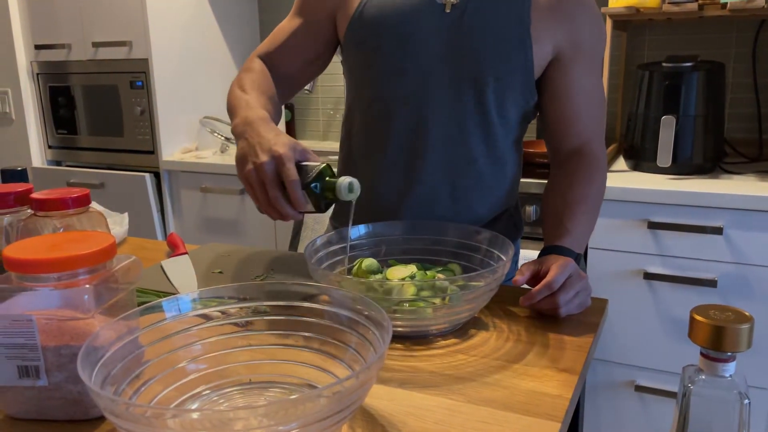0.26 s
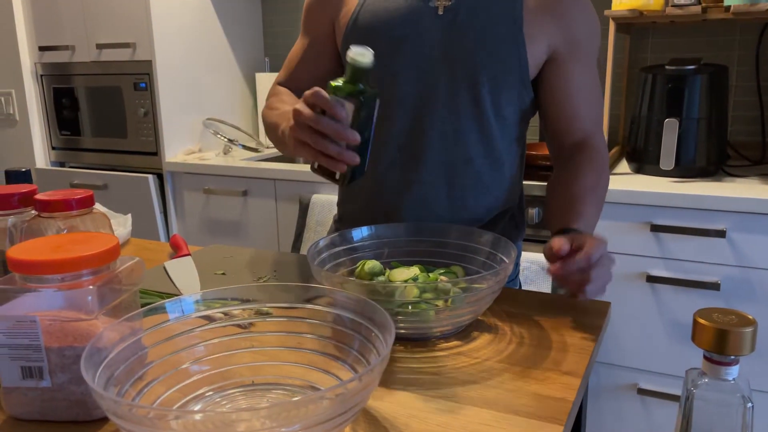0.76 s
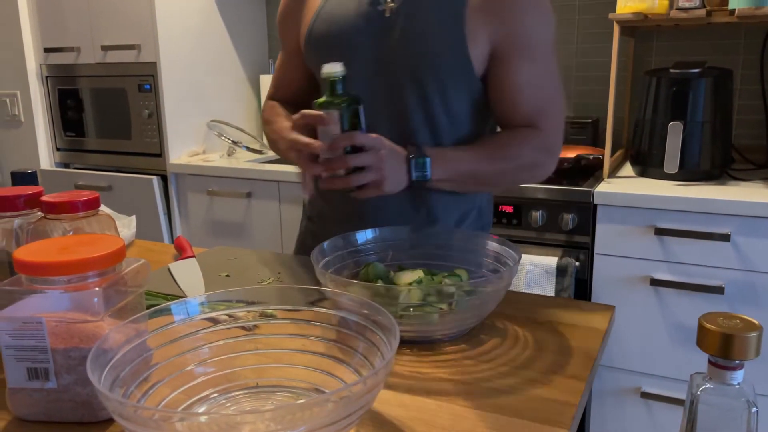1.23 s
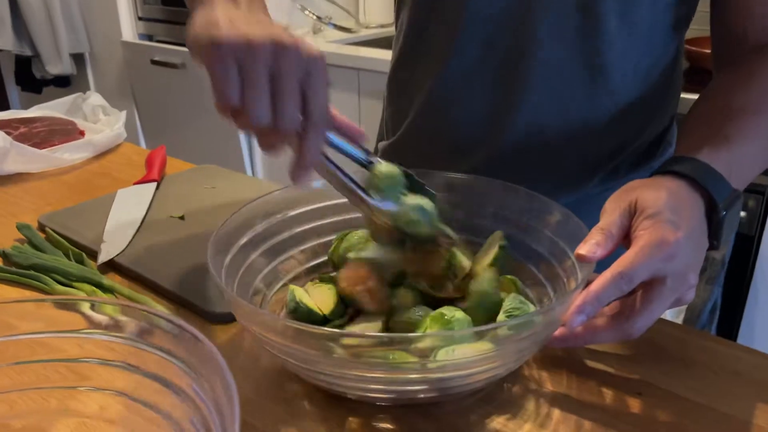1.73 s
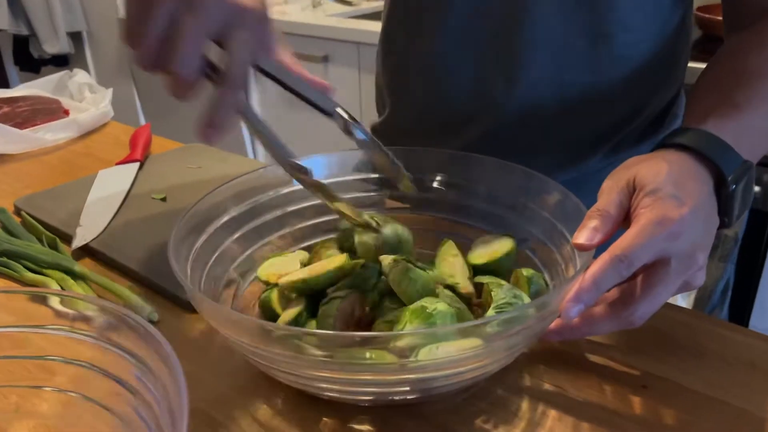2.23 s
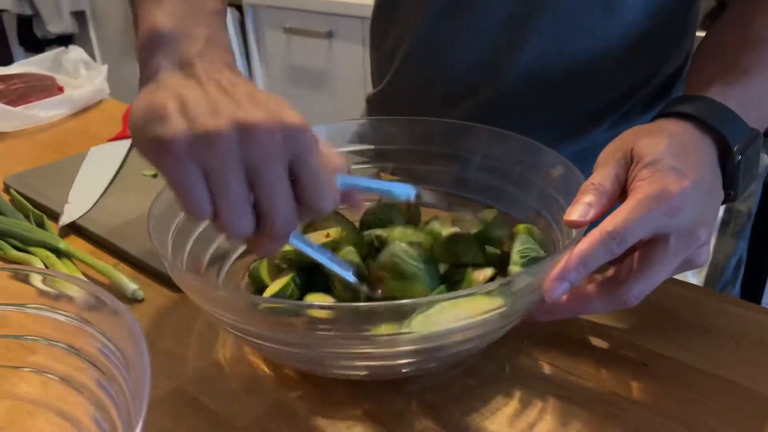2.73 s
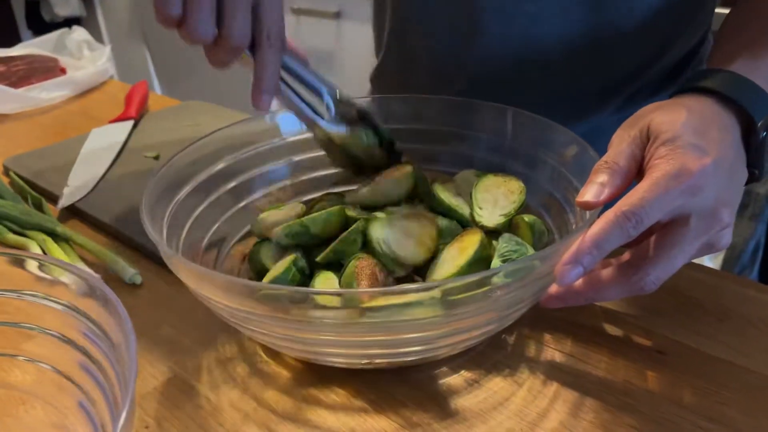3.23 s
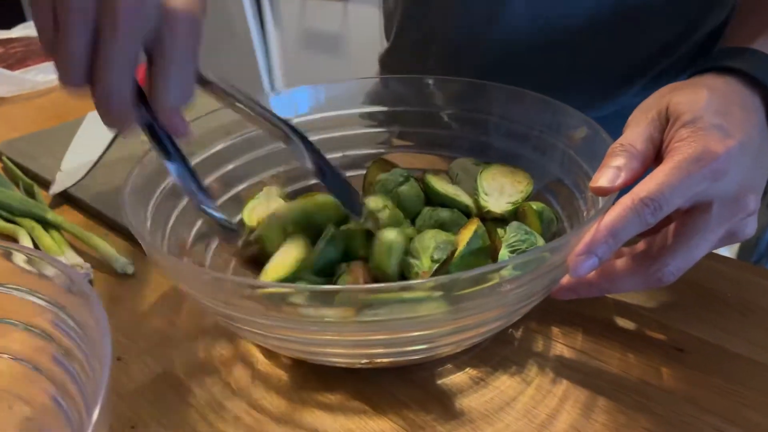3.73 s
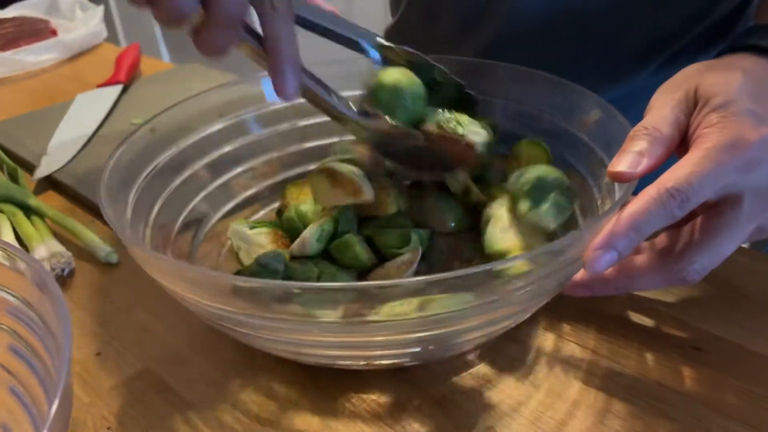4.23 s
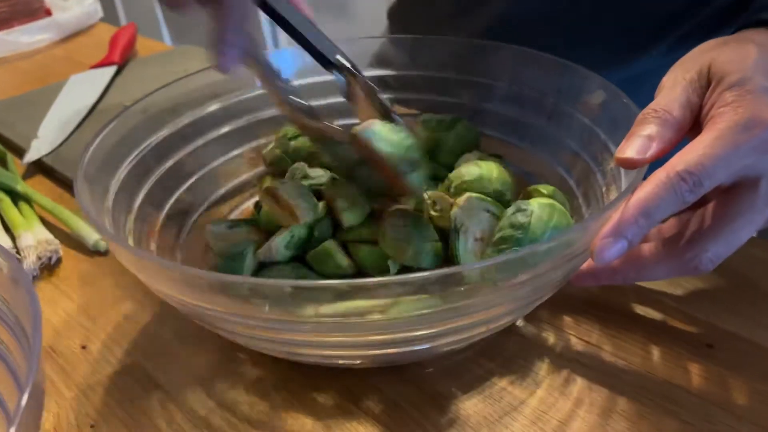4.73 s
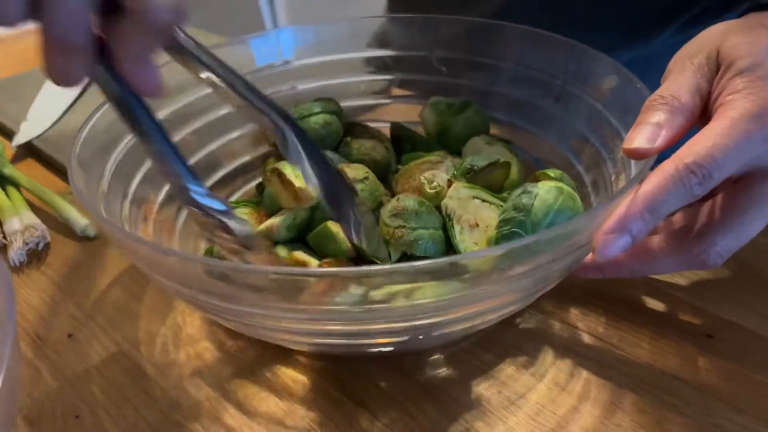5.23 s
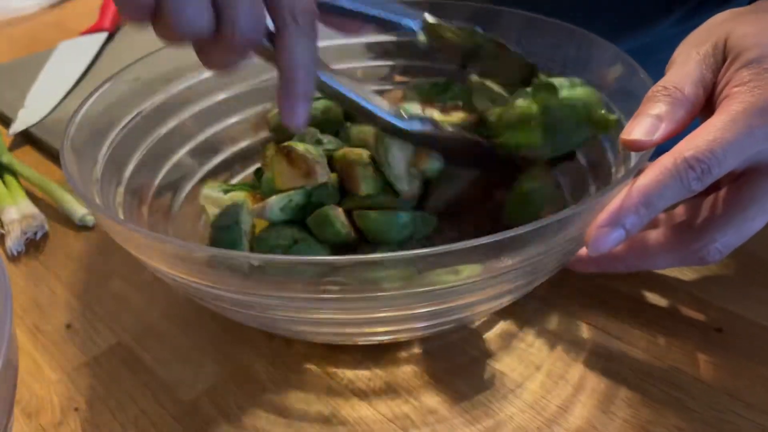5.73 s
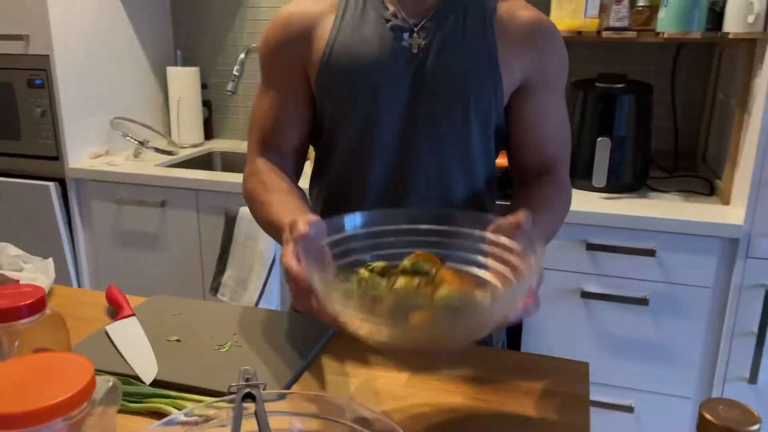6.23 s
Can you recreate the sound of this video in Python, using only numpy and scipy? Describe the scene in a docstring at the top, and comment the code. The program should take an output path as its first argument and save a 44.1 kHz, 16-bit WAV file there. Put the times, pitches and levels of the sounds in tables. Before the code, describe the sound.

Quiet kitchen air and low handling rumble surround soft bubbling gulps from a bottle, followed by a barely audible brush of clothes. Closer up, metal tongs stir oily sprouts in uneven strokes, with crackling leaves, dull tumbling pieces and sharp knocks on the glass, a few leaving a short ring. Fine steel ticks scatter between them. At the end the stirring cuts off into soft handling.

```python
"""Tossing sprouts in a glass bowl

A small kitchen at a wooden counter, on a hand-held microphone that sways with a deep rumble.
A last drizzle of oil glugs from a bottle as damped, rising bubbles; then steel tongs toss halved sprouts.
The tongs clack on the bowl and tick as ringing modes, sprouts thud back on the low modes,
and oily leaves rustle and crackle as showers of tiny clicks. The room answers the bowl, leaves and hands."""
import sys
import numpy as np
from scipy import signal
from scipy.fft import rfft, irfft
from scipy.io import wavfile
from scipy.ndimage import uniform_filter1d

SR = 44100
rng = np.random.default_rng(int(sys.argv[2]) if len(sys.argv) > 2 else 0)


def master_out(mix):
    """Clip the mix to full scale and print it as 16-bit PCM to the path in sys.argv[1]."""
    frames = np.transpose(np.atleast_2d(mix))
    ceiling = np.clip(frames, -1, 1)
    pcm = np.round(ceiling * 32767).astype(np.int16)
    wavfile.write(sys.argv[1], SR, pcm)


N = 285055
T = np.arange(N) / SR  # s
RING_T = T[:SR // 4]  # a quarter of a second for each single blow


def undb(db):
    """Decibels to gain."""
    return 10 ** (np.asarray(db) / 20)


def unit(x):
    """Scale to rms 1."""
    return x / np.sqrt(np.mean(x ** 2))


def curve(rows):
    """Gain over time from a table of (s, dB)."""
    return undb(np.interp(T, *np.transpose(rows)))


def add(track, s, x):
    """Mix x into the track from time s."""
    i = max(int(s * SR), 0)
    track[i:i + len(x)] += x[:N - i]


def colour(x, points):
    """Filter by a spectrum of (Hz, dB) points, joined on a log-frequency axis."""
    hz, db = np.transpose(points)
    f = np.maximum(np.fft.rfftfreq(len(x), 1 / SR), 1)
    gain = undb(np.interp(np.log(f), np.log(hz), db))
    return irfft(rfft(x) * gain, len(x))


def bell(f, hz, octaves):
    """Smooth weight around a centre on a log-frequency axis."""
    return np.exp(-.5 * (np.log2(np.maximum(f, 1) / hz) / octaves) ** 2)


def band_noise(size, hz, octaves):
    """Noise of rms 1 around a centre."""
    weight = bell(np.fft.rfftfreq(size, 1 / SR), hz, octaves)
    return unit(irfft(rfft(rng.standard_normal(size)) * weight, size))


def walk(rate):
    """Random wander through `rate` new values a second, spread near 1."""
    knots = rng.standard_normal(1024)
    return np.interp(T * rate, np.arange(len(knots)), knots)


def fade(t, t60):
    """Exponential decay that loses 60 dB in t60 seconds."""
    return np.exp(-np.log(1000) * t / t60)


def grains(per_s, spread_db):
    """Random clicks of either sign, with exponentially distributed dB sizes that are capped."""
    hit = rng.random(N) < per_s / SR
    size = np.minimum(rng.exponential(size=N), np.pi)
    sign = rng.choice([-1, 1], N)
    return hit * sign * undb(spread_db * size)


def gestures(rows, attack_s):
    """Gain over time of (s, length s, dB, t60 s) movements: each swells, holds and dies away; powers add."""
    power = 0
    for s, length, db, t60 in rows:
        swell = np.clip((T - s) / attack_s, 0, 1)
        decay = fade(np.maximum(T - s - length, 0), t60)
        power = power + (undb(db) * swell * decay) ** 2
    return np.sqrt(power)


# Ringing modes of the loaded bowl on the counter, the bowl wall, and the arms and tips of the tongs.
# Each row: frequency in Hz, relative level in dB, t60 in seconds.
BODY_MODES = [(180, -3, .13), (243, -6, .11), (320, -3, .11), (368, -8, .06), (470, -3, .055),
              (572, 0, .045), (650, -1, .045), (990, -10, .03), (1090, -6, .04), (1188, -9, .04)]
WALL_MODES = [(855, -6, .055), (1068, -11, .18), (1282, -1, .06), (1487, 3, .06), (1750, 1, .055),
              (1905, -4, .04), (2030, -6, .035), (2225, -6, .04), (2530, -4, .04), (2712, -6, .045),
              (2825, -7, .045)]
ARM_MODES = [(3020, -28, 0.0097), (3236, 8, 0.013), (3950, 8.5, 0.0078), (4230, -30, 0.039),
             (5060, 1.5, 0.021), (5190, -21, .03), (5570, -4, 0.027)]
TIP_MODES = [(6260, -9, .022), (7030, -7, .03), (7870, -7, .024), (8330, -7, .026), (8600, -8, .02),
             (9200, -8, .02), (10200, -9, .018), (12100, -11, .015), (14100, -11, .015)]


def strike(modes, hz, octaves, crack_db, crack_t60, crack_octaves, rise_s, scatter_db=2, detune=0.0024):
    """One blow: the modes that the contact favours, and a crack of dense, quickly damped ones."""
    f, db, t60 = np.transpose(modes)
    spot, grip = rng.standard_normal((2, len(f)))
    # the spot that is hit sets each mode's share and sign
    gain = undb(db + scatter_db * spot) * bell(f, hz, octaves) * rng.choice([-1, 1], len(f))
    # the shifting grip and load detune it
    mode_hz = f * (1 + detune * grip)
    waves = np.sin(2 * np.pi * mode_hz[:, None] * RING_T) * fade(RING_T, t60[:, None])
    ring = gain @ waves / np.sqrt(np.sum(gain ** 2) / 2)
    crack = undb(crack_db) * band_noise(len(RING_T), hz, crack_octaves) * fade(RING_T, crack_t60)
    blow = (ring + crack) * (1 - np.exp(-RING_T / rise_s))
    loudest = np.sqrt(uniform_filter1d(blow ** 2, size=176).max())  # rms over 4 ms
    return blow / loudest


# Spectrum of the kitchen air, before its level is set. Each row: frequency in Hz, relative level in dB.
AIR_SPECTRUM = [(15, 20.5), (30, 16), (50, -7), (90, 0), (170, 0), (280, -10.5), (360, -6), (480, -18),
                (900, -18.5), (1600, -27.5), (4000, -37.5), (15000, -41.5)]


def air():
    """Quiet, restless kitchen air: coloured noise whose level wanders."""
    level_db = -49 + 2 * walk(rate=11)
    return unit(colour(rng.standard_normal(N), AIR_SPECTRUM)) * undb(level_db)


# Unsteadiness of the hand on the microphone, before each layer's own gain.
# Each row: time in seconds, level in dB.
SWAY = [(0, -58.5), (1.0, -62.5), (1.5, -46.5), (1.92, -55.5), (2.15, -45.5), (2.3, -65), (2.48, -50.5),
        (3.9, -56.5), (4.52, -48), (4.8, -60), (5.45, -68), (5.7, -51), (6.15, -60.5), (6.46, -58)]


def microphone():
    """The slow rocking of the microphone, with uneven rumble from the hand that holds it."""
    rocking_hz = 12 * undb(0.88 * walk(rate=21))
    rocking = np.sin(2 * np.pi * np.cumsum(rocking_hz) / SR)
    sway = undb(24) * rocking + undb(20) * band_noise(N, hz=4.94, octaves=0.12)
    boom = band_noise(N, hz=60, octaves=.5)
    rumble = undb(-2) * band_noise(N, hz=26, octaves=0.79) + undb(-6.5) * boom
    grip = undb(3 * walk(rate=17))
    return (sway + rumble * grip) * curve(SWAY)


# The bowl pressed against the counter. Each row: start in seconds, level in dB before the swell.
BUMPS = [(1.46, -44), (2.12, -43), (3.14, -43), (3.54, -37), (6.06, -45)]


def worktop():
    """A push on the bowl makes the wooden top boom softly: low noise that swells and dies."""
    out = np.zeros(N)
    swell = fade(RING_T, t60=0.24) - fade(RING_T, t60=0.067)
    for s, db in BUMPS:
        add(out, s, undb(db) * band_noise(len(RING_T), hz=62, octaves=0.55) * swell)
    return out


# Air gulped by the oil bottle. Each row: start in seconds, level in dB, starting pitch in Hz.
GLUGS = [(0.333, -28.5, 148), (0.7566, -33, 185), (1.1571, -34, 185), (1.3337, -30, 163)]


def bottle():
    """Each gulp of air is a heavily damped bubble whose pitch climbs, with a faint wash of noise."""
    out = np.zeros(N)
    for s, db, hz in GLUGS:
        pitch_hz = hz * (2 - fade(RING_T, t60=0.083))  # climbs towards the octave
        bubble = np.sin(2 * np.pi * np.cumsum(pitch_hz) / SR) * fade(RING_T, t60=0.025)
        wash = band_noise(len(RING_T), hz=580, octaves=0.69) * fade(RING_T, t60=0.14)
        add(out, s, -undb(db) * bubble)
        add(out, s, undb(db - 31.0) * wash)
    return out


# Hands and clothes brushing before and after the tossing.
# Each row: start in seconds, length in seconds, level in dB, fading t60 in seconds.
BRUSHES = [(.12, 0.33, -86, 0.27), (.44, 0.039, -82, 0.36), (.62, 0.053, -73.5, .2),
           (.77, 0.028, -77, 0.27), (.87, 0.043, -67, .4), (.97, 0.031, -66.5, 1.1),
           (1.16, 0.25, -74.5, 0.4), (6.14, 0.037, -53, 0.45), (6.23, 0.057, -52, 0.52)]


def handling():
    """Hands and clothes brush softly while the bottle is put away and the bowl is lifted: dense soft clicks."""
    cloth_spectrum = [(100, -20), (300, 5.5), (750, -7.5), (1700, -2),
                      (4000, -9), (8500, -12.0), (11000, -19.5), (16000, -25)]
    cloth = unit(colour(grains(per_s=6400, spread_db=3.5), cloth_spectrum))
    return cloth * gestures(BRUSHES, attack_s=0.011)


# Blows after which the glass rings on freely.
# Each row: start in seconds, frequency in Hz, level in dB, t60 in seconds.
RINGS = [(3.609, 1068, -32, .24), (4.872, 1750, -39, .4), (2.493, 2030, -37, .2), (5.407, 655, -31, .07)]


def rim():
    """Where the tongs rebound, one ring of the glass outlasts the rest: a decaying sine."""
    out = np.zeros(N)
    for s, hz, db, t60 in RINGS:
        add(out, s, undb(db) * np.sin(2 * np.pi * hz * RING_T) * fade(RING_T, t60))
    return out


# Rubbing along the glass.
# Each row: start in seconds, length in seconds, level in dB before tapering and radiation, centre in Hz.
SCRAPES = [(2.5, .1, -46, 330), (3.244, 0.044, -54, 1750), (3.904, 0.04, -50, 383),
           (4.869, 0.081, -41.5, 494), (4.879, 0.052, -38.5, 300), (4.893, 0.044, -63, 1820),
           (4.947, 0.0336, -44, 2800), (5.013, 0.036, -50.5, 1540), (5.459, 0.14, -54, 1980),
           (6.23, 0.15, -63.5, 1770)]


def scrapes():
    """Steel sticks and slips on the ribbed glass; each slip rings bowl and tongs a little."""
    out = np.zeros(N)
    for s, length, db, hz in SCRAPES:
        ring = strike(BODY_MODES + WALL_MODES + ARM_MODES, hz, octaves=.16,
                      crack_db=-4, crack_t60=.014, crack_octaves=.5, rise_s=.0003)
        stroke = signal.windows.tukey(int(max(length, .01) * SR), .3)
        slips = signal.fftconvolve(grains(per_s=700, spread_db=3.5), ring)
        slips = slips[SR:SR + len(stroke)]  # a stretch where slips already overlap
        add(out, s, undb(db) * unit(slips) * stroke)
    return out


# Sprouts dropping into the bowl.
# Each row: start in seconds, thud in dB before damping and radiation, thud centre in Hz,
# wet slap in dB before fading and radiation.
THUDS = [(1.466, -40.5, 175, -52.5), (1.641, -36, 164, -56), (1.705, -33.5, 157, -47),
         (1.768, -39, 146, -53), (1.914, -25.5, 202, -33), (2.045, -35.5, 250, -63),
         (2.266, -39.5, 174, -53), (2.591, -29.5, 240, -57), (2.876, -34.5, 246, -58),
         (3.52, -39.5, 198, -49.5), (3.959, -35.5, 244, -62), (4.055, -32.5, 200, -56),
         (4.355, -27.5, 404, -44), (4.387, -12.5, 582, -32.5), (4.42, -33, 610, -59),
         (4.529, -42, 1060, -33.5), (4.796, -50, 220, -53), (4.904, -31, 285, -41),
         (5.072, -32, 352, -36.5), (5.319, -44.5, 217, -50), (5.426, -52, 157, -45), (5.787, -36, 295, -56),
         (5.872, -41, 249, -59), (6.441, -48, 560, -50.5)]


def sprouts():
    """Soft, heavy pieces wake only the low modes and smother them as they settle, with a small slap of oil."""
    out = np.zeros(N)
    for s, db, hz, slap_db in THUDS:
        thud = strike(BODY_MODES, hz, octaves=.85, crack_db=-3, crack_t60=.024, crack_octaves=.45,
                      rise_s=.002, scatter_db=1.5)
        smothering = 0.28 + fade(RING_T, t60=0.032)
        slap = band_noise(len(RING_T), hz=1750, octaves=0.89) * fade(RING_T, t60=0.047)
        add(out, s, undb(db) * thud * smothering)
        add(out, s, undb(slap_db) * slap)
    return out


def crackle(hz):
    """Leaves of one size peel apart, each in a burst of noise a few milliseconds long."""
    peels = np.abs(grains(per_s=70, spread_db=4.5))
    bursts = signal.fftconvolve(peels, fade(RING_T, t60=.016))[:N]
    return bursts * band_noise(N, hz, octaves=0.51) * np.sqrt(hz)


# Strokes of the tongs through the sprouts.
# Each row: start in seconds, push length in seconds, leaf rustle in dB, tumbling in dB, settling t60 in
# seconds. Both levels are before the flicker.
STROKES = [(1.347, 0.062, -51.5, -51, 0.51), (1.485, 0.67, -57, -62.5, 0.74),
           (1.905, 0.044, -47.5, -47.5, 1.13), (2.257, 0.025, -58.5, -68, 0.7),
           (2.385, 0.15, -43.5, -43, 0.79), (2.732, 0.21, -54.5, -61, 0.42), (2.868, 0.047, -52, -70, 1.07),
           (3.053, 0.12, -57.5, -67, .7), (3.232, 0.019, -43, -49, 0.67), (3.47, 0.12, -67, -62, 0.36),
           (3.632, 0.087, -44, -50.5, 1.27), (3.842, 0.027, -52.5, -51.5, 3),
           (4.145, 0.19, -49.5, -56, 1.3), (4.38, 0.09, -51.5, -44, 0.39), (4.47, 0.049, -43.5, -60, 0.92),
           (4.871, 0.17, -50.5, -49, 0.38), (4.933, 0.028, -37.5, -44, 0.15), (5.189, 0.026, -59, -82, 1.1),
           (5.361, 0.18, -54, -55.5, .5), (5.473, 0.061, -50.5, -49, 0.57), (5.612, 0.24, -51.5, -54.5, .6),
           (5.782, 0.19, -54.5, -53.5, 0.38), (6.054, 0.076, -42.5, -40.5, .3)]
# Spectra of leaves and tumbling pieces. Each row: frequency in Hz, relative level in dB.
LEAF_SPECTRUM = [(300, -37), (800, 0), (1100, 5.5), (1400, -1), (1800, 3.5), (2500, 1.5), (4000, 0.5),
                 (6000, -3), (8500, -1.5), (11000, -12.5), (13000, -11), (15500, -12)]
TUMBLE_SPECTRUM = [(40, -2), (90, -5.5), (180, 1), (320, -6), (450, -18.5), (600, -8.5), (800, -14.5),
                   (1500, -18), (4000, -46)]


def stirring():
    """Oily leaves stick and peel in tiny clicks while pieces tumble over each other, then settle."""
    start_s, end_s = 1.345, 6.11
    active = uniform_filter1d(1. * ((T > start_s) & (T < end_s)), size=128)
    rub = unit(colour(grains(per_s=6000, spread_db=-0.5), LEAF_SPECTRUM))
    peel = unit(colour(sum(crackle(hz) for hz in (1520, 2836, 5240, 9400)), LEAF_SPECTRUM))
    rustle = unit(rub + .9 * peel)
    tumble = unit(colour(grains(per_s=220, spread_db=4.5), TUMBLE_SPECTRUM))
    attack_s = 0.023
    leaves = gestures([(s, push, db, t60) for s, push, db, _, t60 in STROKES], attack_s)
    pieces = gestures([(s, push, db, t60) for s, push, _, db, t60 in STROKES], attack_s)
    catching = undb(1.6 * walk(rate=35))  # the level flickers
    return active * catching * (rustle * leaves + tumble * pieces)


# Tongs on the bowl, all levels before radiation.
# Each row: start in seconds, clack in dB before choking, clack centre in Hz, thud in dB,
# thud centre in Hz, steel clink in dB (its arms; tips and snap are set against them).
CLACKS = [(1.624, -41, 1000, -32.5, 185, -56), (1.901, -21.5, 2000, -31.5, 560, -23.5),
          (2.391, -11.5, 1290, -27.5, 216, -22.5), (2.477, -35.5, 2200, -49, 300, -43),
          (2.492, -24.5, 2230, -37.5, 306, -27), (2.525, -34, 2010, -33.5, 310, -38),
          (3.165, -36, 1830, -30.5, 285, -43.5), (3.608, -14, 1610, -26, 417, -21),
          (3.693, -26.5, 1720, -51, 191, -30.5), (3.709, -33.5, 2640, -34.5, 257, -35),
          (3.898, -34.5, 1940, -57, 151, -39.5), (4.177, -37, 1780, -41.5, 613, -47),
          (4.872, -37, 1980, -28, 475, -54), (4.961, -28, 820, -29.5, 275, -34.5),
          (5.405, -32, 2400, -37, 740, -30), (5.533, -31, 2000, -50.5, 241, -41),
          (5.943, -39, 1780, -37, 247, -40.5), (6.021, -30, 1990, -37.5, 665, -37.5),
          (6.055, -39, 2080, -47, 175, -50)]
# Light ticks of the steel tips. Each row: start in seconds, level in dB before radiation, centre in Hz.
TICKS = [(1.158, -61.5, 3460), (1.703, -47, 3450), (1.8729, -41.5, 3840), (2.1572, -40.5, 6840),
         (2.3602, -36, 7500), (2.499, -25.5, 4550), (3.3526, -48, 3650), (3.3856, -38.5, 7860),
         (3.4424, -42, 7200), (3.721, -33.5, 7300), (4.1634, -50, 3570), (4.26, -39.5, 7600),
         (4.283, -41.5, 8900), (5.004, -35.5, 8500), (5.0484, -32, 7600), (5.1052, -31.5, 6900),
         (5.194, -44.5, 7500), (5.3155, -48.5, 8700), (5.4065, -39, 15000), (5.547, -40.5, 5140),
         (5.647, -51, 3020)]


def tongs():
    """Steel meets glass: wall, loaded bowl, arms and tips ring together; light ticks ring only the steel."""
    out = np.zeros(N)
    tips_db, snap_db = -2.5, -10  # relative to the arms
    # the tongs stay pressed on the glass and choke most of the ring
    choking = 0.092 + fade(RING_T, t60=0.041)
    for s, db, hz, thud_db, thud_hz, clink_db in CLACKS:
        wall = strike(WALL_MODES, hz, octaves=.6, crack_db=0, crack_t60=.03, crack_octaves=.42,
                      rise_s=.0008, scatter_db=1.5, detune=.005)
        body = strike(BODY_MODES, thud_hz, octaves=1.0, crack_db=0.5, crack_t60=0.076, crack_octaves=0.87,
                      rise_s=0.00048)
        arms = strike(ARM_MODES, hz=3450, octaves=.9, crack_db=0, crack_t60=.025, crack_octaves=.55,
                      rise_s=.00016, detune=.02)
        tips = strike(TIP_MODES, hz=9000, octaves=.57, crack_db=5, crack_t60=.011, crack_octaves=.5,
                      rise_s=.0004, detune=.012)
        # the first hard touch of steel on glass
        snap = band_noise(len(RING_T), hz=13500, octaves=.25) * fade(RING_T, t60=.008)
        add(out, s, undb(db) * wall * choking)
        add(out, s, undb(thud_db) * body)
        add(out, s, undb(clink_db) * (arms + undb(tips_db) * tips + undb(snap_db) * snap))
    for s, db, hz in TICKS:
        tick = strike(ARM_MODES + TIP_MODES, hz, octaves=.34, crack_db=5, crack_t60=.017, crack_octaves=.7,
                      rise_s=.0007, detune=.025)
        add(out, s, undb(db) * tick)
    return out


# How well the bowl radiates its knocks. Each row: frequency in Hz, gain in dB.
RADIATION = [(120, -2), (200, -1), (310, -1.5), (400, 0), (520, 2), (680, -.5), (760, -5), (880, -2),
             (1100, -3), (1300, -1), (1550, 1.5), (2100, 1), (2330, -2), (2600, 0), (3200, -1), (3900, 1.5),
             (6300, -1), (9000, 0)]


def radiate(knocks):
    """The bowl passes some frequencies to the air more readily than others."""
    return colour(knocks, RADIATION)


def room(x, t60=0.47, treble_t60=0.18, wet_db=-7, early_db=-11):
    """Counter and cupboards return a quick cluster of echoes and a short diffuse tail, both decaying noise."""
    t = T[:SR]
    low_spectrum = [(60, -14), (250, 5.5), (800, -5), (2000, 0), (6000, -5.5)]
    high_spectrum = [(1000, -32.0), (3500, -0.5), (9000, 4.0), (15000, 10.5)]
    low = colour(rng.standard_normal(SR), low_spectrum) * fade(t, t60)
    high = colour(rng.standard_normal(SR), high_spectrum) * fade(t, treble_t60)
    tail = (low + high) * (1 - np.exp(-t / 0.0012))
    early = colour(rng.standard_normal(SR), [(600, -9), (2000, -2.5)]) * fade(t, t60=0.049) * (t > .003)
    response = (undb(wet_db) * unit(tail) + undb(early_db) * unit(early)) / np.sqrt(SR)
    return x + signal.fftconvolve(x, response)[:N]


# Brief lulls. Each row: start in seconds, length in seconds, depth in dB.
LULLS = [(.085, .03, -5), (.37, .05, -4), (.695, .04, -7), (4.835, .033, -10), (6.111, .032, -16),
         (6.143, .08, -3)]


def lulls():
    """Gain over time: now and then the level dips for an instant, with softened edges."""
    dip_db = 0
    for s, length, db in LULLS:
        dip_db = dip_db + db * uniform_filter1d(1. * ((T > s) & (T < s + length)), size=160)
    return undb(dip_db)


def scene():
    """Bowl, leaves and hands sound into the kitchen; worktop, bottle and microphone rumble come dry."""
    knocks = radiate(tongs() + scrapes() + sprouts())
    counter = knocks + rim() + stirring() + handling()
    kitchen = (room(counter) + air()) * lulls()
    return (kitchen + worktop() + bottle() + microphone())[None]


def record(dry):
    """The recorder cuts the top above 15950 Hz with a steep low-pass."""
    lowpass = signal.ellip(10, .2, 70, 15950, fs=SR, output="sos")
    return signal.sosfilt(lowpass, dry)


dry = scene()
out = record(dry)
master_out(out)
```